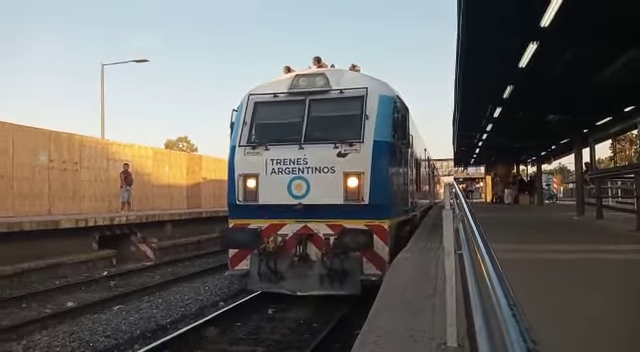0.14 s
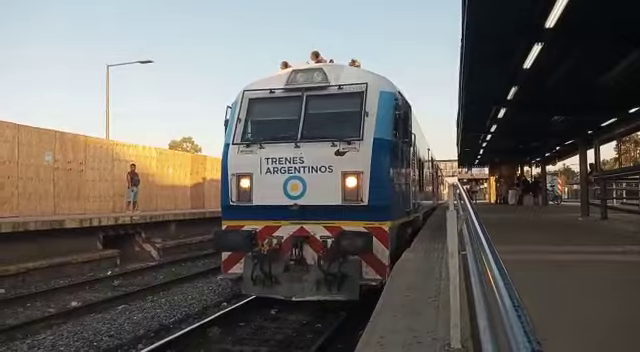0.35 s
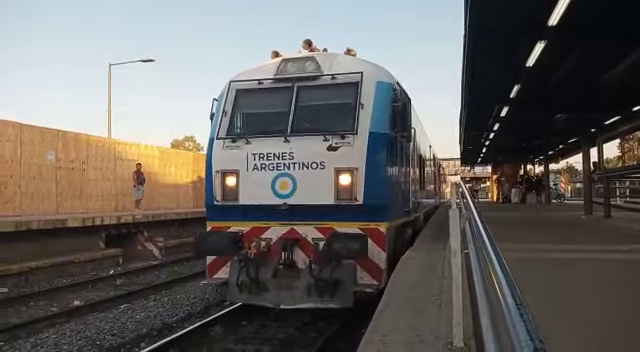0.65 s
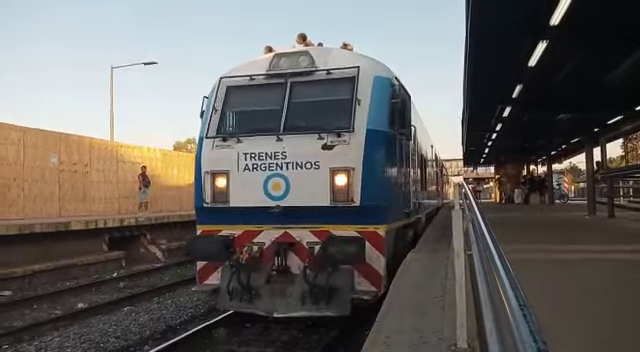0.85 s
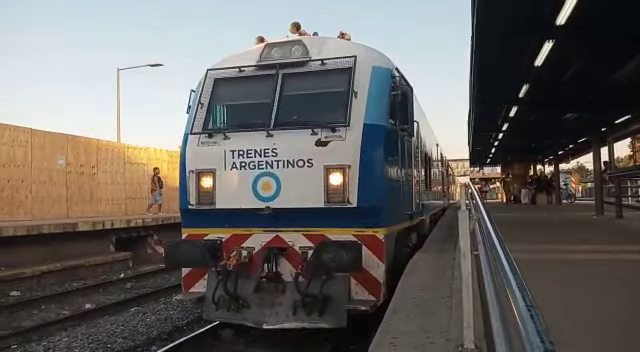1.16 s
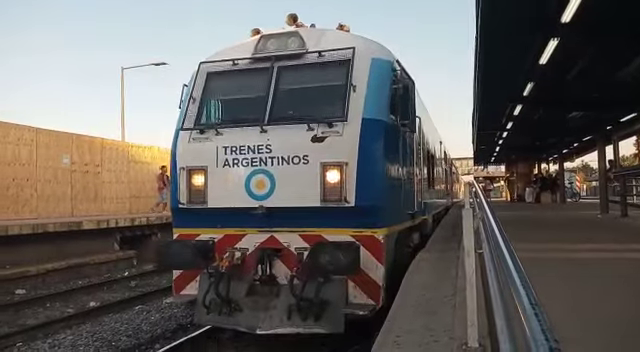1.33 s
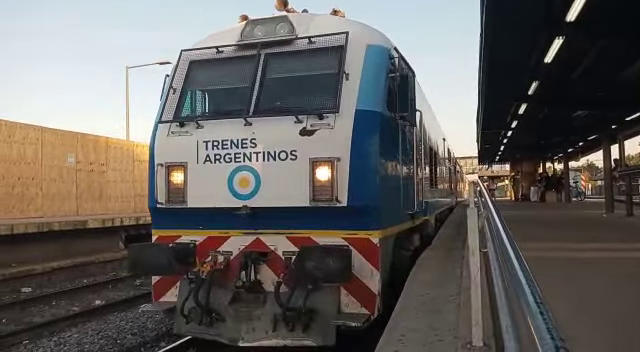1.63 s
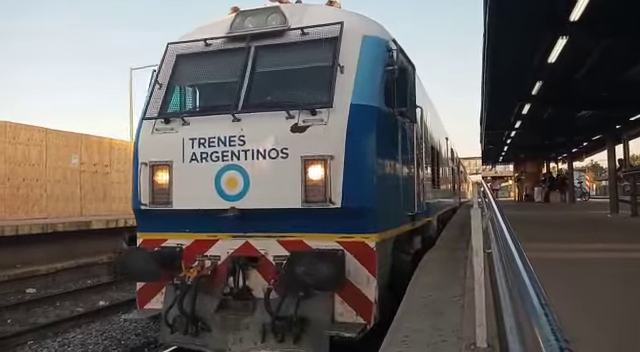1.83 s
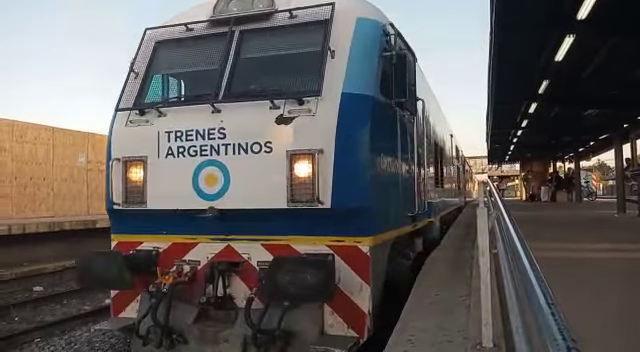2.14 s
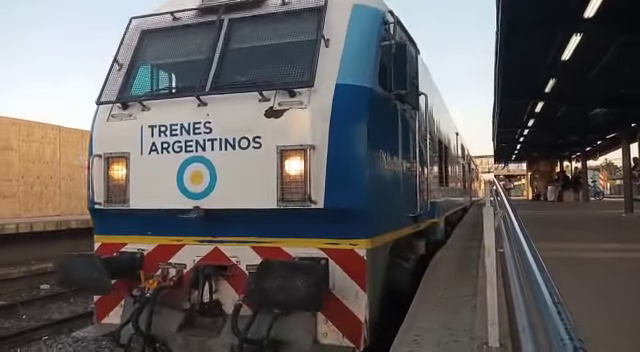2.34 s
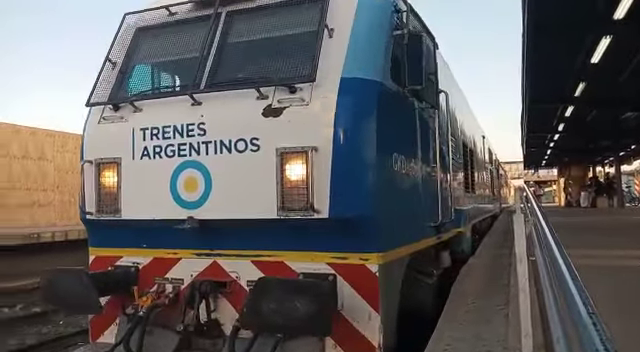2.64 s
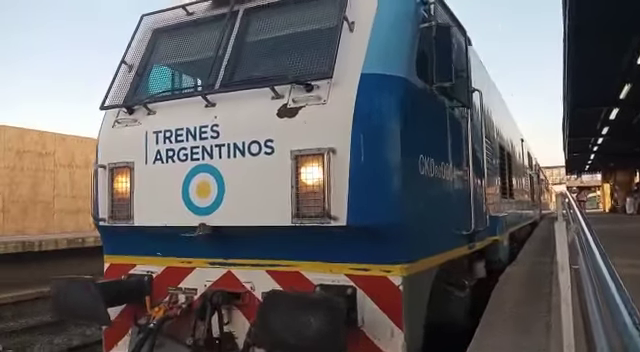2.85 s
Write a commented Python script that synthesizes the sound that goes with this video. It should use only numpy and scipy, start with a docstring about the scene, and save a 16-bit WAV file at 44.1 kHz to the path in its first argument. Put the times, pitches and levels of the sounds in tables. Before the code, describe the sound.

A diesel locomotive rolls slowly in, engine clattering, blower whining, air hissing beside the platform

```python
"""A diesel engine throbs and clatters as its locomotive rolls slowly along a station platform:
exhaust tones at multiples of the engine cycle, part-repeating noise, and ringing housing resonances.
A blower whines in two clusters of beating tones, multiples of its shaft speed, over rushing air.
Air hisses throughout as shaped noise; a brighter jet dies away, then opens again near the end."""
import sys
import numpy as np
from scipy import signal
from scipy.fft import rfft, irfft, next_fast_len
from scipy.io import wavfile
from scipy.ndimage import uniform_filter1d, minimum_filter1d

SR = 44100
rng = np.random.default_rng(int(sys.argv[2]) if len(sys.argv) > 2 else 0)


def to_wav(sig):
    """Store sig (one row per channel, or 1-D mono) as 16-bit WAV at the path in sys.argv[1].

    Samples outside -1..1 are clipped; the rate is SR.
    """
    pcm = np.clip(np.atleast_2d(sig), -1, 1) * 32767
    pcm = np.round(pcm).astype(np.int16)
    wavfile.write(sys.argv[1], SR, pcm.T)  # frames by channels


N = 131418
T = np.arange(N) / SR  # s


def from_db(db):
    """Decibels to amplitude gain."""
    return 10 ** (np.asarray(db) / 20)


def rms_one(x):
    """Scale to unit rms."""
    return x / np.sqrt(np.mean(x ** 2) + 1e-20)


def noise():
    """White noise, the raw material of turbulence."""
    return rng.standard_normal(N)


def in_time(rows):
    """Join (t/s, value) points by straight lines."""
    return np.interp(T, *np.transpose(rows))


def gain_in_time(rows):
    """Join (t/s, level/dB) points and convert to gain."""
    return from_db(in_time(rows))


def drift(rate_hz):
    """Slow random motion, rms 1: noise through a two-pole lowpass at 1/40 of the sample rate."""
    step, settle = 40, 2000  # samples, slow samples
    r = np.exp(-2 * np.pi * rate_hz * step / SR)
    raw = rng.standard_normal(N // step + settle + 2)
    slow = signal.lfilter([1], [1, -2 * r, r * r], raw)[settle:]
    return np.interp(np.arange(N) / step, np.arange(len(slow)), rms_one(slow))


def coloured(x, spectrum):
    """Shape x by (f/Hz, level/dB) points joined over log frequency, with steep skirts; rms 1."""
    hz, db = np.transpose(spectrum)
    size = next_fast_len(N + 4096)
    f = np.maximum(np.arange(size // 2 + 1) * SR / size, 1)
    low_skirt = 1 + (hz[0] / f / 2) ** 6
    high_skirt = 1 + (f / hz[-1] / 2) ** 6
    shape = from_db(np.interp(np.log(f), np.log(hz), db)) / np.sqrt(low_skirt * high_skirt)
    return rms_one(irfft(rfft(x, size) * shape, size)[:N])


def resonances(rows):
    """Turbulence passing twice through each narrow resonance."""
    out = 0
    for hz, width_hz, db in rows:
        r = np.exp(-np.pi * width_hz * 1.5 / SR)  # 1.5: two passes narrow the peak
        section = [1, 0, -1, 1, -2 * r * np.cos(2 * np.pi * hz / SR), r * r]
        ringing = signal.sosfilt([section, section], rng.standard_normal(N + SR))[SR:]  # settled
        out = out + from_db(db) * rms_one(ringing)
    return out


WAVER_HZ = 3.5


def tone(turns, multiple, waver, scatter=1):
    """One multiple of a rotation, wavering as its reflections shift; random phase, rms 1."""
    reflections = (drift(WAVER_HZ) + 1j * drift(WAVER_HZ)) / np.sqrt(2)
    paths = np.sqrt(1 - waver ** 2) + waver * reflections
    cycles = multiple * turns + scatter * rng.random()
    return rms_one(np.real(paths * np.exp(2j * np.pi * cycles)))


# steady hiss spectrum: f/Hz, relative level per Hz/dB
HISS_SPECTRUM = [(1500, -4.5), (2300, -2), (2900, 0.5), (3700, -2.5), (4300, -1.5), (5200, 1), (5800, -4),
                 (6400, -12.5), (7200, -19), (8000, -24.5), (9000, -36), (13000, -31.5), (16000, -51)]
HISS_DB = -29.5


def hiss():
    """Steady air turbulence: noise with a fixed spectrum."""
    return from_db(HISS_DB) * coloured(noise(), HISS_SPECTRUM)


# jet level: t/s, level/dB
JET_LEVEL = [(0, -28), (.1, -29.5), (.25, -30.5), (.5, -32.5), (.8, -41), (2.15, -45), (2.38, -38.5),
             (2.56, -29), (2.8, -29), (2.98, -29)]
# jet spectrum: f/Hz, relative level per Hz/dB
JET_SPECTRUM = [(2000, -36), (3100, -6), (3600, -1), (4100, 2.5), (5200, 0.5), (5700, -8.5), (6500, -18),
                (8000, -29)]
# jet whistles: f/Hz, width/Hz, level re jet/dB
JET_RINGS = [(3180, 100, -12.5), (4810, 220, -5), (5264, 190, -7.5)]


def jet():
    """Bright turbulent jet with faint whistles at its resonances."""
    return gain_in_time(JET_LEVEL) * (coloured(noise(), JET_SPECTRUM) + resonances(JET_RINGS))


# sizzle level: t/s, level/dB
SIZZLE_LEVEL = [(0, -50), (.1, -49), (.25, -60), (.6, -80), (2.1, -66), (2.31, -49), (2.37, -64),
                (2.46, -46), (2.6, -41), (2.98, -41.5)]
# sizzle spectrum: f/Hz, relative level per Hz/dB
SIZZLE_SPECTRUM = [(6500, -1), (8500, -4), (9400, 6), (10600, -1.5), (13000, 2.5), (14200, 1), (15000, -2),
                   (16000, -5)]
# sizzle resonances: f/Hz, width/Hz, level re sizzle/dB
SIZZLE_RINGS = [(7600, 27, -30), (8100, 130, -16), (9010, 160, -14.5), (9800, 60, -18), (11900, 150, -18),
                (13100, 270, -15)]
# very high edge level: t/s, level/dB
EDGE_LEVEL = [(0, -43), (.1, -48), (.22, -66), (.5, -78), (2.39, -78), (2.45, -43), (2.54, -54),
              (2.98, -62)]
# very high edge spectrum: f/Hz, relative level per Hz/dB
EDGE_SPECTRUM = [(12000, -35), (14200, -10), (14900, 3), (15800, -7)]


def jet_top():
    """Sizzling top of the jet and its thin, very high edge: shaped noise, the sizzle also ringing."""
    sizzle = coloured(noise(), SIZZLE_SPECTRUM) + resonances(SIZZLE_RINGS)
    edge = gain_in_time(EDGE_LEVEL) * coloured(noise(), EDGE_SPECTRUM)
    return gain_in_time(SIZZLE_LEVEL) * sizzle + edge


def air(flutter_db=0.67, top_flutter_db=0.7):
    """Hiss and jet flutter together in level (rms dB); the jet's top flutters apart."""
    body = (hiss() + jet()) * from_db(flutter_db * drift(20))
    return body + jet_top() * from_db(top_flutter_db * drift(15))


# shaft speed: t/s, speed/(rev/s)
SHAFT_SPEED = [(0, 20.14), (.7, 20.12), (1.5, 20.06), (2.98, 20.06)]
# leading tones at 44, 45, 87 x shaft: t/s, level/dB
TONE_44_LEVEL = [(0, -32), (.55, -28), (.8, -33), (1.15, -26.5), (1.3, -56), (1.45, -21.5), (1.65, -23),
                 (1.85, -32.5), (2.05, -23.5), (2.3, -30.5), (2.52, -24), (2.72, -33), (2.9, -24.5)]
TONE_45_LEVEL = [(0, -34), (.18, -22.5), (.33, -37), (.55, -25.5), (.76, -21), (1, -37), (1.36, -23.5),
                 (1.52, -24), (1.68, -31.5), (2.4, -30.5), (2.62, -35), (2.78, -26.5), (2.98, -37)]
TONE_87_LEVEL = [(0, -37), (.65, -31.5), (1, -38), (1.4, -35), (1.7, -42.5), (2.15, -32.5), (2.52, -25.5),
                 (2.98, -42.5)]
# weaker tones: multiple of shaft speed, level/dB
SIDE_TONES = [(39, -42), (42, -33), (43, -36.5), (46, -34), (47, -36.5), (84, -50), (86, -41), (88, -40),
              (89, -40), (90, -45)]
# air rushing through the blower: f/Hz, width/Hz, level/dB
BLOWER_RUSH = [(897, 86, -31.5), (1761, 65, -32.5), (2652, 12, -47), (2903, 12, -57), (4160, 22, -45.5)]
# swell of weaker tones and rush: t/s, level change/dB
SIDE_SWELL = [(0, -3.5), (.4, 0), (.75, -1), (1.1, 2.5), (1.45, -0.5), (1.8, 0), (2.2, 1), (2.6, 2),
              (2.98, 2.5)]
LEAD_WAVER, SIDE_WAVER = .12, .85  # wavering amplitude, 0..1


def blower():
    """Neighbouring multiples of the shaft speed beat into a fluttering whine over rushing air."""
    turns = np.cumsum(in_time(SHAFT_SPEED)) / SR
    leading = [(44, TONE_44_LEVEL), (45, TONE_45_LEVEL), (87, TONE_87_LEVEL)]
    whine = sum(gain_in_time(level) * tone(turns, k, LEAD_WAVER) for k, level in leading)
    sides = sum(from_db(db) * tone(turns, k, SIDE_WAVER) for k, db in SIDE_TONES)
    return whine + gain_in_time(SIDE_SWELL) * (sides + resonances(BLOWER_RUSH))


# drone resonance: f/Hz, width/Hz, level re drone/dB
DRONE_RESONANCE = [(391.5, 22, 0)]
# drone level: t/s, level/dB
DRONE_LEVEL = [(0, -34.5), (.2, -39), (.37, -28.5), (.5, -58), (1.1, -39.5), (1.7, -45), (1.87, -30),
               (2, -53), (2.14, -28), (2.35, -36.5), (2.98, -41)]


def drone():
    """Hollow drone that comes and goes: noise through one resonance."""
    return gain_in_time(DRONE_LEVEL) * resonances(DRONE_RESONANCE)


CYCLE_HZ = 6.69  # full engine cycles
# clatter and rolling roar spectrum: f/Hz, relative level per Hz/dB
CLATTER_SPECTRUM = [(30, -35), (60, -24), (100, -16), (160, -10), (240, -7), (300, -3), (410, -1),
                    (560, -1.5), (720, -2), (1000, -2.5), (1180, -2), (1450, -10.5), (1900, -9.5),
                    (2400, -24), (5000, -40)]
# clatter level: t/s, level/dB
CLATTER_LEVEL = [(0, -23.5), (.4, -24), (.8, -23.5), (1.15, -24), (1.55, -23.5), (1.9, -22.5), (2.3, -23),
                 (2.7, -23.3), (2.98, -23)]
# engine housing resonances: f/Hz, width/Hz, level/dB
HOUSING = [(271.3, 16, -44.5), (450, 48, -40), (521.5, 19, -40.5), (593, 12, -49), (1176, 27, -44.5)]
CLATTER_REPEATS = .2  # power share alike in every cycle


def clatter():
    """Noise that partly repeats each engine cycle; housing resonances swell with it."""
    pattern = noise()[np.arange(N) % int(SR / CYCLE_HZ)]
    raw = np.sqrt(CLATTER_REPEATS) * pattern + np.sqrt(1 - CLATTER_REPEATS) * noise()
    level = gain_in_time(CLATTER_LEVEL)
    return level * coloured(raw, CLATTER_SPECTRUM) + rms_one(level) * resonances(HOUSING)


# exhaust tones: multiple of engine cycle, level/dB
EXHAUST_TONES = [(10, -70), (11, -65), (13, -77), (15, -59), (16, -54), (18, -53), (19, -78), (20, -61),
                 (21, -55), (23, -43.5), (24, -48.5), (25, -45), (27, -72), (29, -49), (33, -53), (39, -48),
                 (40, -49.5)]
# deep firing tone, eight to a cycle: t/s, level/dB
FIRING_LEVEL = [(0, -56), (1.4, -53), (2.35, -55), (2.65, -62), (2.98, -63)]
BEAT_S = .09  # first heavy beat
BEAT_SCATTER = .22  # looseness of tone alignment on the beat, share of tone period
EXHAUST_WAVER = .2  # wavering amplitude, 0..1


def exhaust():
    """Multiples of the engine cycle, loosely aligned in phase, throb once a cycle."""
    turns = CYCLE_HZ * (T - BEAT_S)
    firing = gain_in_time(FIRING_LEVEL) * tone(turns, 8, 0)
    return firing + sum(from_db(db) * tone(turns, k, EXHAUST_WAVER, BEAT_SCATTER)
                        for k, db in EXHAUST_TONES)


def engine():
    """Throbbing exhaust over clatter, housing ring and drone."""
    return exhaust() + clatter() + drone()


def scene():
    """The locomotive as heard from the platform, one channel."""
    return (air() + blower() + engine())[None]


PEAK_CEILING = .39  # amplitude ahead of the lowpass
LIMITER_RELEASE_DB_PER_S = 400
CUTOFF_HZ = 15800


def record(dry):
    """A quick look-ahead limiter holds the highest peaks down; a steep lowpass cuts the top."""
    over_db = 20 * np.log10(np.maximum(abs(dry[0]) / PEAK_CEILING, 1))
    release_db = LIMITER_RELEASE_DB_PER_S * T
    held_db = np.maximum.accumulate(over_db + release_db) - release_db
    gain = from_db(uniform_filter1d(minimum_filter1d(-held_db, size=129), size=129))
    lowpass = signal.ellip(12, .1, 80, CUTOFF_HZ, fs=SR, output="sos")
    return signal.sosfilt(lowpass, dry * gain)


dry = scene()
out = record(dry)
to_wav(out)
```